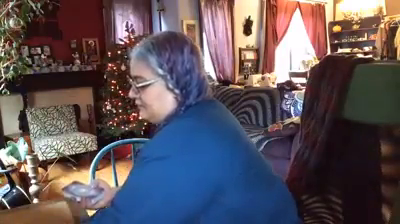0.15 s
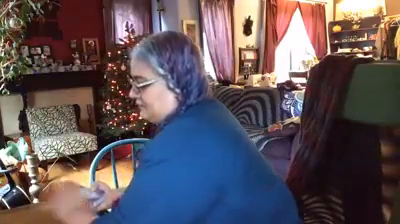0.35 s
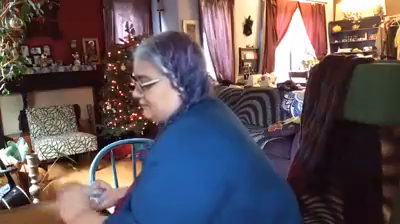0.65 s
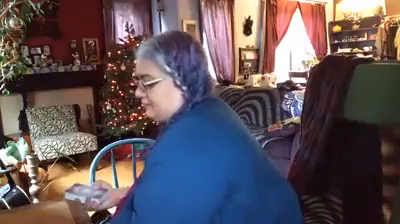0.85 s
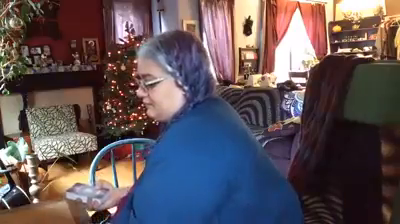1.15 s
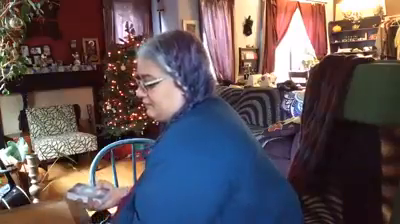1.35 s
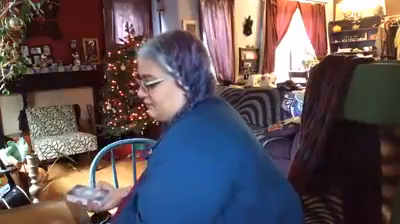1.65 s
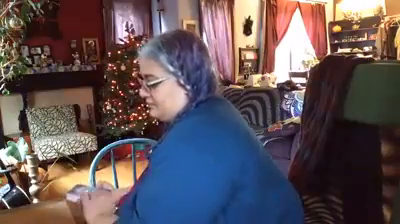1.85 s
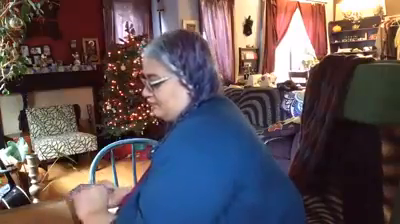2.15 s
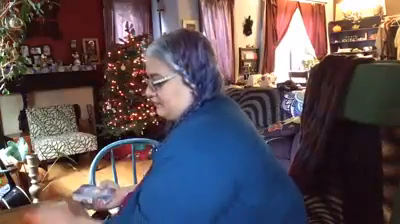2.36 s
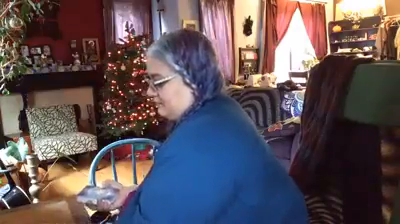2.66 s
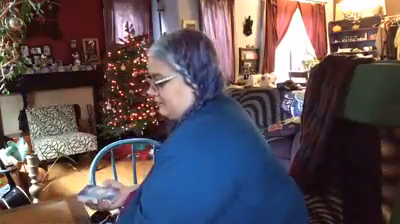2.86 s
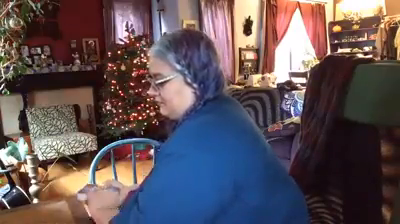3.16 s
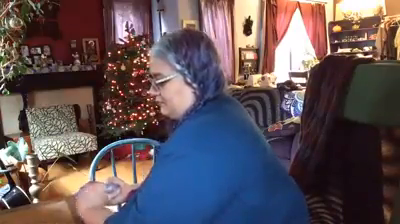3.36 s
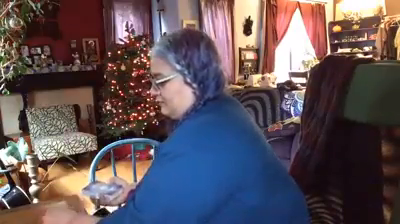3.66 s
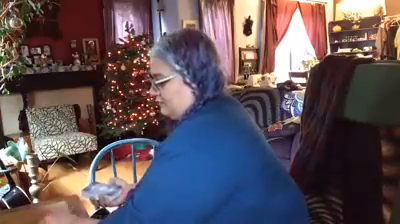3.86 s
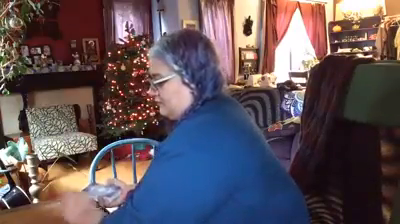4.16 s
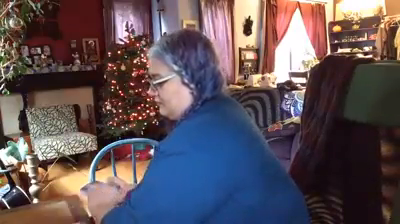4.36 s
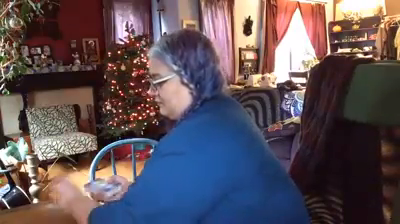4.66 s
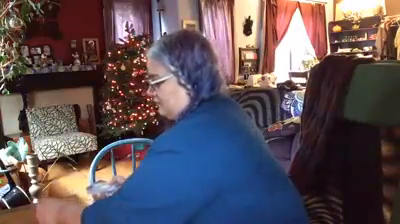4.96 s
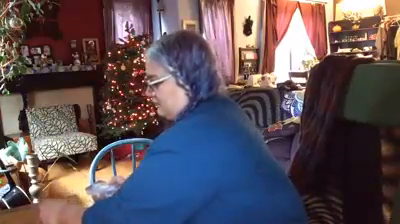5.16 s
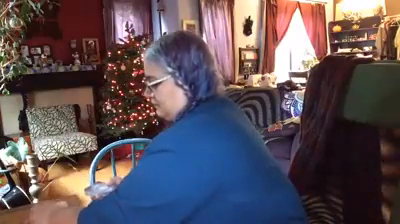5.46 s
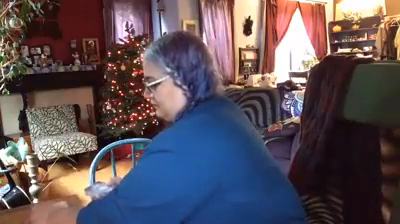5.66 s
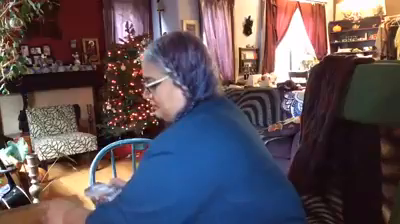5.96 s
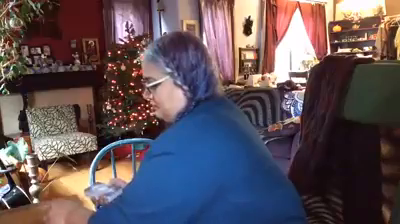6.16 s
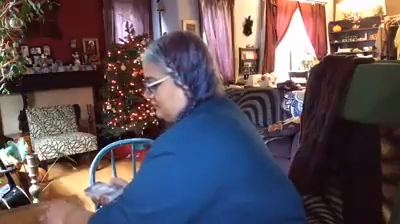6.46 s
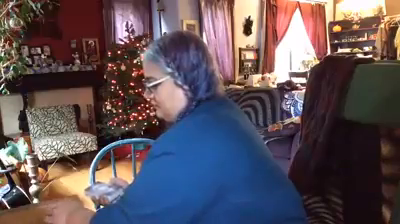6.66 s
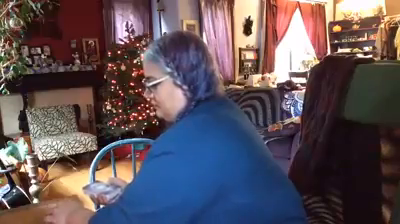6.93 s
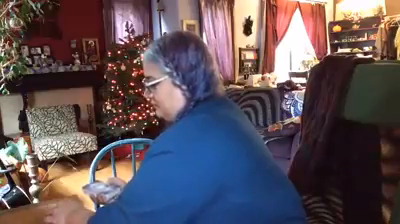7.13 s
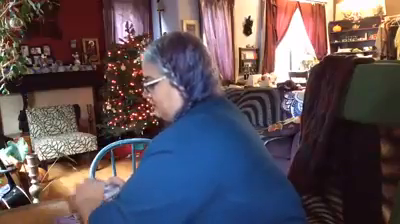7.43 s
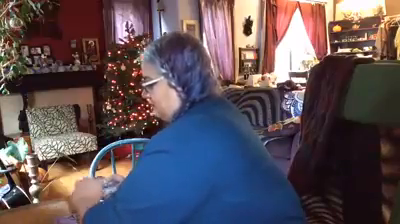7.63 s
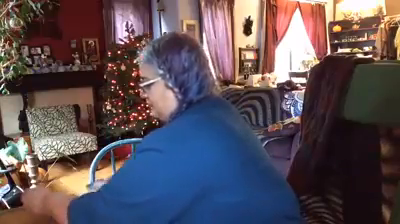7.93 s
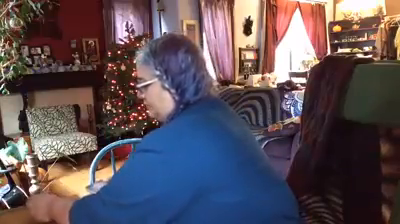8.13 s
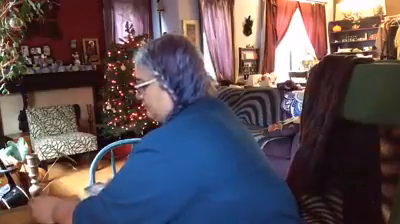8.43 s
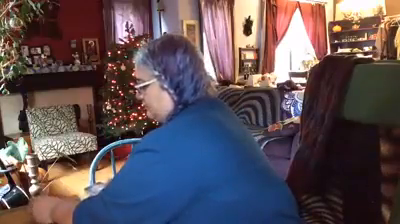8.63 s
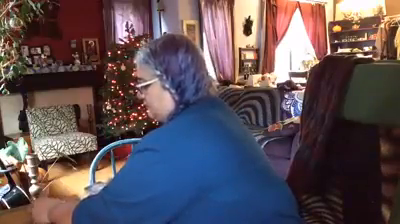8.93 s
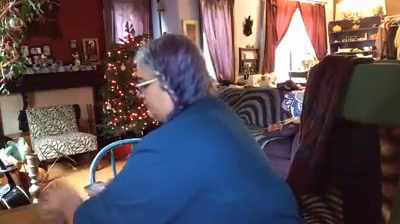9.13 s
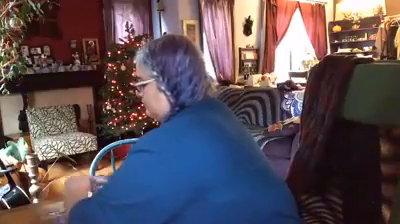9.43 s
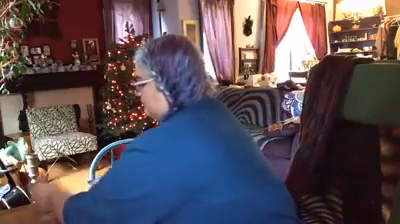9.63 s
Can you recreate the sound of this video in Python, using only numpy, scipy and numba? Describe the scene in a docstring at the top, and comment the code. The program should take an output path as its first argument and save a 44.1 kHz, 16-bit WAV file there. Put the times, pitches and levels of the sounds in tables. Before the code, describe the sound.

Playing cards slide off a deck and snap onto a wooden table at irregular intervals, while a low engine-like drone swells early and fades.

```python
"""Dealing cards onto a table

Playing cards are dealt one by one onto a wooden table in a quiet, furnished living room.
Each card rubs off the deck (filtered noise), ticks against its neighbours and is snapped down
(noise bursts through resonances), knocking the table top (decaying sines). A sleeve rustles.
A low drone of wavering sines and rumble, probably an engine outside, swells and fades under faint hiss."""
import sys
import numpy as np
from scipy import signal
from scipy.fft import rfft, irfft, next_fast_len
from scipy.io import wavfile
from scipy.ndimage import uniform_filter1d, map_coordinates
from numba import njit

SR = 44100
rng = np.random.default_rng(int(sys.argv[2]) if len(sys.argv) > 2 else 0)


def generate_wav(sig):
    """Save sig (samples, or channels by samples) to the path in sys.argv[1] as 16-bit PCM at SR."""
    pcm = np.round(np.clip(np.atleast_2d(sig).T, -1, 1) * 32767).astype(np.int16)
    wavfile.write(sys.argv[1], SR, pcm)


N = 431738
T = np.arange(N) / SR
CONTACT_LEAD_S = 1 / 50  # build-up ahead of each contact

# cards snapped down: (time [s], slap [dB], flex [dB], crack [dB], flutter t60 [s], table knock [dB],
#   spot across the table [0-1], lower slap note [Hz], upper slap note [Hz], upper against lower [dB],
#   flex note [Hz], flex note against the broad flex [dB])
SNAP_EVENTS = [ (0.1802, -52, -62, -59, 0.029, -48, 0.25, 670, 1154, -1, 2360, -5),
               (1.2675, -47.5, -43, -39, 0.027, -42, 0.44, 618, 834, 0.5, 3950, 2),
               (2.3601, -59.5, -61, -70.5, 0.075, -58, .4, 483, 1216, 7, 2320, 13),
               (2.949, -44.5, -49, -45.5, 0.03, -39, 0.11, 810, 1020, -1, 2990, -1),
               (4.066, -54.5, -58, -60, 0.047, -45.5, 0.57, 600, 1320, 0, 2600, -11),
               (4.712, -63.5, -67, -71.5, .06, -65, 0.28, 600, 1270, -2, 2390, 6),
               (4.9192, -65, -69, -75, 0.09, -60, 0.52, 840, 1180, 5, 3470, -6),
               (5.587, -66, -69, -82, 0.058, -55.5, 0.44, 580, 830, -7, 2850, -1.5),
               (6.149, -69.5, -59.5, -75, 0.04, -68, 0.22, 1097, 1600, -4, 2860, 13),
               (6.464, -64, -65.5, -60, .05, -59.5, 0.1, 734, 810, -8, 3580, 1.5),
               (9.015, -54.5, -56, -61.5, 0.032, -61, .3, 756, 1010, 4, 3910, -1.5),
               (9.773, -65.5, -73.5, -78, 0.11, -63, 0.4, 810, 1320, 8, 3010, -5)]
# colour of air squeezed from under a card: (frequency [Hz], gain [dB])
SLAP_COLOUR = [(100, -8), (300, -1), (520, -2), (800, -0.5), (1250, -2), (1700, -12.5), (4000, -50)]
# colour of a bending card: (frequency [Hz], gain [dB])
FLEX_COLOUR = [(900, -16), (1500, 0), (2300, 7), (4100, 6.5), (5000, -4), (8000, -32)]
# colour of a card's crisp edge: (frequency [Hz], gain [dB])
CRACK_COLOUR = [(3000, -19.5), (5000, 0), (6800, 0.5), (10500, 0), (13000, -2.5), (16000, -7.5)]


def undb(db):
    """Decibels to gain."""
    return 10 ** (np.asarray(db) / 20)


def unit(x):
    """Scale to rms 1."""
    return x / np.sqrt(np.mean(x ** 2))


def decay(t, t60):
    """Exponential fall by 60 dB in t60 seconds."""
    return np.exp(-np.log(1000) * t / t60)


def add(out, x, s):
    """Mix x into out from time s on."""
    i = int(s * SR)
    out[i:i + len(x)] += x[:max(N - i, 0)]


def colour(x, points, size=4096):
    """Minimum-phase filter with the given (Hz, dB) outline, made by folding the cepstrum."""
    hz, db = np.transpose(points)
    log_hz = np.log(np.fft.rfftfreq(size, 1 / SR) + 1)
    gain = undb(np.interp(log_hz, np.log(hz), db))
    cepstrum = irfft(np.log(gain))
    cepstrum[1:size // 2] *= 2
    cepstrum[size // 2 + 1:] = 0
    impulse = irfft(np.exp(rfft(cepstrum)))
    return signal.fftconvolve(x, impulse)[:len(x)]


def ring(x, hz, q):
    """One fixed resonance."""
    return signal.lfilter(*signal.iirpeak(min(hz, SR / 2 - 1), q, fs=SR), x)


def walk(rate_hz):
    """Smooth random wander with rms 1."""
    k = int(SR / rate_hz)
    steps = np.repeat(rng.standard_normal(N // k + 1), k)
    return unit(uniform_filter1d(steps, k)[:N])


def grains(n, spread_db):
    """Tiny slips of paper fibres, a few much larger than the rest: noise of random level, rms 1."""
    return unit(rng.standard_normal(n) * undb(spread_db * rng.standard_normal(n)))


def contact(t60, rise_s, click, spread_db):
    """A card meets something: a quick build-up, one sharp click, then dying flutter."""
    t = np.arange(SR // 10) / SR - CONTACT_LEAD_S
    envelope = np.where(t < 0, np.exp(-np.abs(t) / rise_s), decay(np.abs(t), t60))
    flutter = grains(len(t), spread_db) * envelope
    impulse = signal.unit_impulse(len(t), np.argmin(np.abs(t)))
    return flutter / np.linalg.norm(flutter) + click * impulse


def snaps():
    """A bent card lets go: air slaps out beneath it, the sheet rings briefly, its edge cracks."""
    # the louder its crack, the crisper a snap:
    # (crack level [dB], crack resonance [Hz], build-up [s], click against flutter [ratio])
    crispness = [(-72, 5000, 0.0029, 0.11), (-59, 5400, 0.0024, 0.44), (-39, 9400, 0.00083, 0.69)]
    slap_q, slap_body_db = 8.8, -3.5
    crack_rise_s = 0.0014
    out = np.zeros(N)
    steps, *traits = np.transpose(crispness)
    for (s, slap_db, flex_db, crack_db, t60, _, _,
         lower_hz, upper_hz, upper_db, flex_hz, note_db) in SNAP_EVENTS:
        crack_hz, rise_s, click = (np.interp(crack_db, steps, trait) for trait in traits)
        push = contact(t60, rise_s, click, spread_db=6.0)
        lower = unit(ring(push, lower_hz, slap_q))
        upper = unit(ring(push, upper_hz, slap_q))
        body = unit(ring(push, np.sqrt(lower_hz * upper_hz), 1.5))
        puff = lower + undb(upper_db) * upper + undb(slap_body_db) * body
        flex_note = unit(ring(push, flex_hz, 7.0))
        flex = unit(colour(push, FLEX_COLOUR)) + undb(note_db) * flex_note
        edge = contact(t60, crack_rise_s, click, spread_db=6.0)
        crack = colour(ring(edge, crack_hz, 0.93), CRACK_COLOUR)
        x = undb(slap_db) * unit(colour(puff, SLAP_COLOUR))
        x += undb(flex_db) * unit(flex)
        x += undb(crack_db) * unit(crack)
        add(out, x, s - CONTACT_LEAD_S)
    return out


def knocks(detune=.012):
    """Fingers press the card home; the table's modes answer in strengths that depend on the spot."""
    # table-top modes: (nominal frequency [Hz], level against the knock [dB], t60 [s])
    table_modes = [(168, 0, 0.13), (215, -3.5, 0.095), (272, -0.5, 0.22), (428, 0.5, 0.07),
                   (502, -7, 0.053), (610, -10.5, 0.046)]
    knock_lag_s = 0.0012  # the fingers land just after the card
    out, t = np.zeros(N), np.arange(SR // 3) / SR
    hz, db, t60 = np.transpose(table_modes)[:, :, None]
    for s, _, _, _, _, level_db, spot, *_ in SNAP_EVENTS:
        pitch_hz = hz * (1 + detune * rng.standard_normal(hz.shape))
        shape = np.sin(np.pi * spot * np.arange(1, len(hz) + 1))[:, None]
        modes = shape * undb(db + level_db) * np.sin(2 * np.pi * pitch_hz * t) * decay(t, t60)
        add(out, modes.sum(axis=0), s + knock_lag_s)
    return out


def ticks():
    """Card edges flick past each other, each bending the card at another pitch."""
    # (time [s], level of the flex part [dB], brightness [dB])
    tick_events = [(0.596, -78, 4), (0.695, -71, -1.5), (.728, -75, -5.5), (.775, -78, -4),
                   (.823, -71.5, 6.5), (0.941, -74, -9), (1.551, -70, 8), (1.95, -80, 0), (2.196, -72, 3.5),
                   (2.504, -66.5, -2.5), (2.671, -75, 0), (2.991, -69, 8), (3.26, -74.5, 3.5),
                   (3.486, -69.5, 2.5), (3.513, -68.5, -1.5), (3.767, -71, -8.5), (4.41, -78.5, 2),
                   (4.684, -75, 7.5), (6.792, -82, 3), (7.577, -73.5, 1), (7.605, -75.5, 0.5),
                   (7.954, -77, -3), (9.381, -79, 2), (9.556, -70.5, 9.5), (9.581, -76, -3.5)]
    slap_rel_db, crack_rel_db = -2, -4.5  # against the flex; brightness trades slap for crack
    out = np.zeros(N)
    for s, level_db, bright_db in tick_events:
        push = contact(t60=0.061, rise_s=0.003, click=0.085, spread_db=3.0)
        bend = push + 1.13 * ring(push, rng.uniform(2000, 2800), 8.3)
        slap = unit(colour(ring(push, 1100, 1.0), SLAP_COLOUR))
        crack = unit(colour(push, CRACK_COLOUR))
        x = undb(slap_rel_db - bright_db) * slap
        x += unit(colour(bend, FLEX_COLOUR))
        x += undb(crack_rel_db + bright_db) * crack
        add(out, undb(level_db) * x, s - CONTACT_LEAD_S)
    return out


def stroke(s, rise_s, fall_s, fullness):
    """The samples that a stroke of the hand spans, and its speed, peaking at time s."""
    span = (T > s - rise_s) & (T < s + fall_s)
    ramp = np.interp(T[span] - s, [-rise_s, 0, fall_s], [0, 1, 0])
    return span, np.sin(np.pi / 2 * ramp) ** fullness


@njit
def glide(x, hz, q):
    """One resonance whose pitch moves: a state-variable band-pass."""
    y, band, low = np.empty(len(x)), 0., 0.
    for i in range(len(x)):
        g = np.tan(np.pi * min(hz[i], .45 * SR) / SR)
        y[i] = (band + g * (x[i] - low)) / (1 + g * (g + 1 / q))
        band, low = 2 * y[i] - band, low + 2 * g * y[i]
    return y


def patchy(x, depth_db, rate_hz, count=13):
    """The touching patch of paper keeps changing, so each band swells and fades by itself."""
    centres = np.linspace(np.log(500), np.log(14000), count)
    spectrum = rfft(x)
    log_hz = np.log(np.fft.rfftfreq(len(x), 1 / SR) + 1)
    out = np.zeros(N)
    for peak in np.eye(count):
        band = irfft(spectrum * np.interp(log_hz, centres, peak), len(x))[:N]
        out += band * undb(depth_db * walk(rate_hz))
    return unit(out)


def slides(catch_db=1.0, lurch_db=0.82, spread_db=4.5):
    """Paper rubs on paper, louder as the hand speeds up; the card resonates, rising as it slides clear."""
    # paper rubbing on paper: (frequency [Hz], gain [dB])
    rub_colour = [(200, 6), (600, 1), (1300, 4.5), (2600, -0.5), (4100, 0), (5200, -7), (9000, -23)]
    # treble of a quick brush: (frequency [Hz], gain [dB])
    hiss_colour = [(2500, -40), (4800, 2), (6800, 10.5), (10000, 4.5), (13000, 0), (16000, -2)]
    # finer treble of a card drawn flat over the deck: (frequency [Hz], gain [dB])
    sheen_colour = [(2500, -35), (4800, 1), (7000, 8.5), (10000, 4.5), (15500, 0.5)]
    # a card is drawn off the deck or pushed along the table; one stops before its peak:
    # (start [s], fastest [s], end [s], rub [dB], hiss [dB], card resonance [dB], its pitch when fastest [Hz])
    draws = [(0.523, 0.623, 0.96, -69.5, -69.5, -75.5, 2460), (1.02, 1.26, 1.195, -67, -80, -74, 3600),
             (1.27, 1.3, 1.488, -71, -77.5, -87.5, 2430), (1.318, 1.65, 1.677, -63.5, -67, -95, 2500),
             (1.99, 2.191, 2.3, -72.5, -69, -78, 2760), (3.268, 3.416, 3.7, -71, -68.5, -75, 2660),
             (4.403, 4.65, 4.86, -75.5, -72.5, -78.5, 2700), (4.92, 5.02, 5.12, -74, -74, -73.5, 2700),
             (5.11, 5.14, 5.34, -73, -74, -79, 2500), (5.36, 5.475, 5.61, -70, -68.5, -71.5, 2600),
             (5.557, 5.68, 5.97, -75, -84, -85, 2540), (5.831, 5.952, 6.13, -71.5, -69, -73.5, 3070),
             (7.6, 7.763, 7.82, -80, -71, -74, 2420), (7.82, 7.895, 8.1, -73, -73.5, -81, 2380),
             (9.38, 9.516, 9.83, -76.5, -69, -74.5, 2680)]
    # a card brushes quickly over another:
    # (fastest [s], rub [dB], hiss [dB], card resonance [dB], its pitch when fastest [Hz])
    brushes = [(1.099, -70, -65.5, -72, 2900), (1.258, -59, -56.5, -59, 4200),
               (2.322, -66, -64.5, -71, 2700), (2.521, -59, -65, -67, 2200), (2.574, -67, -70, -72, 2500),
               (3.68, -60, -67.5, -76, 2600), (3.763, -60.5, -61, -68, 2300),
               (3.88, -67, -72.5, -69.5, 2440), (4.054, -68, -72, -79, 2860), (4.66, -78, -101, -67, 1680),
               (7.768, -77, -67, -70.5, 2400), (8.151, -65.5, -72, -74, 1900),
               (8.421, -73, -69.5, -70, 2577), (8.546, -73, -58, -61, 3100)]
    # a tightly bent card zings: (peak time [s], pitch [Hz], level [dB], fall [s])
    zings = [(1.125, 2550, -68, .06), (1.201, 3100, -55, .035), (2.675, 2700, -60, 0.065),
             (4.68, 2860, -67, .025), (5.46, 2300, -67.5, .1), (6.137, 3030, -67, 0.011),
             (6.185, 3063, -67.5, .11), (6.49, 5660, -60, 0.091), (4.105, 7560, -71, 0.064),
             (6.78, 5100, -72, .06), (7.605, 2780, -69, 0.079), (8.555, 2350, -62, 0.079)]
    crackle_per_s, crackle_db = 150, -6.5  # an edge catches now and then; level against even rubbing
    brush_rise_s, brush_fall_s, zing_rise_s = 0.031, 0.063, 0.013
    card_q, card_glide_oct_per_s, card_wander_oct = 3.0, 0.503, .1  # climbs as the overlap shortens
    scrape_s, scrape_db = 0.014, -12  # edge slips off the thumb around a snap; level against the flex
    skid_rise_s, skid_fall_s, skid_db = 0.031, 0.066, -14  # after a snap; against crack and flex

    catches = unit(rng.standard_normal(N) * (rng.random(N) < crackle_per_s / SR))
    fibres = patchy(grains(next_fast_len(N, True), spread_db), depth_db=3, rate_hz=28)
    unevenness = undb(catch_db * walk(130) + lurch_db * walk(28))
    slips = (fibres + undb(crackle_db) * catches) * unevenness
    rub = unit(colour(slips, rub_colour))
    hiss = unit(colour(slips, hiss_colour))
    sheen = unit(colour(slips, sheen_colour))
    wander_oct = card_wander_oct * walk(23)
    out = np.zeros(N)

    moves = [(s, stroke(s, s - start, end - s, fullness=0.78), sheen, *rest)
             for start, s, end, *rest in draws]
    moves += [(s, stroke(s, brush_rise_s, brush_fall_s, fullness=1.3), hiss, *rest)
              for s, *rest in brushes]
    for s, (span, speed), treble, rub_db, hiss_db, card_db, hz in moves:
        card_hz = hz * 2 ** (card_glide_oct_per_s * (T[span] - s) + wander_oct[span])
        card = unit(glide(rub[span], card_hz, card_q))
        x = undb(rub_db) * rub[span] + undb(hiss_db) * treble[span] + undb(card_db) * card
        out[span] += speed * x

    for s, hz, level_db, fall_s in zings:
        span, speed = stroke(s, zing_rise_s, fall_s, fullness=3.0)
        out[span] += speed * undb(level_db) * unit(ring(slips[span], hz, 11.0))

    for s, _, flex_db, crack_db, *_, flex_hz, _ in SNAP_EVENTS:
        span, speed = stroke(s, scrape_s, scrape_s / 2, fullness=0.69)
        scrape = unit(hiss[span] + 4.4 * ring(slips[span], flex_hz, 4.5))
        out[span] += speed * undb(flex_db + scrape_db) * scrape
        span, speed = stroke(s + skid_rise_s, skid_rise_s, skid_fall_s, fullness=1.5)
        skid = undb(crack_db) * hiss[span] + undb(flex_db) * rub[span]
        out[span] += speed * undb(skid_db) * skid
    return out


def bounce(x):
    """The table mirrors a sliding card; the reflection's lag sways as the hand moves, shifting the colour."""
    share, usual_lag_s, sway = 0.32, 0.001092, .22
    lag_s = usual_lag_s * np.exp(sway * walk(5))
    return x + share * map_coordinates(x, [(T - lag_s) * SR], order=3)


def sleeve():
    """Cloth drags over the table in soft, uneven rustles."""
    # (peak time [s], level [dB])
    rustles = [(3.56, -71.5), (5.68, -69.5), (5.86, -68), (6.92, -79), (7.15, -78), (8.92, -74),
               (9.61, -79.5)]
    # cloth on wood: (frequency [Hz], gain [dB])
    cloth_colour = [(150, -11), (400, 2), (1100, 5), (1700, -10.5), (4000, -22.5)]
    rustle_s = 0.067  # rise, and again fall
    out = np.zeros(N)
    cloth = unit(colour(grains(N, 7.4), cloth_colour)) * undb(3.1 * walk(30))
    for s, level_db in rustles:
        span, speed = stroke(s, rustle_s, rustle_s, fullness=1.6)
        out[span] += speed * undb(level_db) * cloth[span]
    return out


def room(x, wet_db, gap_s=0.0029):
    """Scattered echoes from walls and furniture, soon soaked up: noise bands with their own decays."""
    # (band low [Hz], band high [Hz], t60 [s], level before wet_db [dB])
    room_bands = [(117, 483, 0.27, -19), (700, 2900, 0.32, -19), (1740, 4900, 0.61, -22),
                  (4430, 8200, 0.33, -15.5), (8880, 15000, 0.23, -14.5)]
    t, tail = np.arange(SR // 2) / SR, 0
    onset = np.clip(t / gap_s - 1 / 2, 0, 1)
    for low_hz, high_hz, t60, db in room_bands:
        edges_hz = [low_hz, min(high_hz, SR / 2 - 1)]
        band_pass = signal.butter(3, edges_hz, "band", fs=SR, output="sos")
        echo = signal.sosfilt(band_pass, grains(len(t), 1.2)) * onset * decay(t, t60)
        tail = tail + undb(db) * unit(echo) / np.sqrt(len(t))  # unit energy before the level
    return x + undb(wet_db) * signal.fftconvolve(x, tail)[:N]


def tone(hz, level_db, waver_db, waver_hz):
    """One sine of the drone, wavering in pitch and level."""
    phase = 2 * np.pi * np.cumsum(hz + waver_hz * walk(14)) / SR
    return np.sqrt(2) * np.sin(phase) * undb(level_db + waver_db * walk(11))


def drone():
    """A boom, a hum, weaker tones and rumble; the weaker tones and rumble swell with the boom."""
    # strength before trim: (time [s], deep tone [dB], upper tone [dB])
    drone_levels = [(0.0, -63, -58.5), (.27, -60.5, -62), (.4, -60.5, -54), (0.95, -62, -52.5),
                    (1.16, -57, -59.5), (1.45, -47.5, -52), (1.55, -45, -50), (1.62, -41, -43),
                    (1.78, -38.5, -44), (1.92, -37, -51.5), (2.06, -37.5, -44.5), (2.37, -44, -54),
                    (2.48, -57, -54), (2.61, -44.5, -59), (2.72, -56.5, -55), (2.82, -49, -56.5),
                    (2.98, -66, -49), (3.05, -55.5, -64), (3.35, -66, -67.5), (4.95, -60, -65.5),
                    (6.0, -61, -66), (6.539, -65.5, -63), (6.76, -56, -68.5), (7.58, -71, -73.5),
                    (9.79, -72, -73)]
    # the engine gathers speed twice: (time [s], deep tone [Hz], upper tone [Hz])
    engine_pitch = [(0, 56, 121.3), (.6, 56.5, 124), (1.5, 57.5, 126), (2.05, 58.6, 129), (3, 60, 125.4),
                    (4.2, 62, 117.8), (5.2, 65, 123), (5.5, 57, 125), (6.601, 62, 133), (7.3, 60, 131),
                    (7.9, 57, 116.1), (9.79, 58, 118)]
    # weaker tones: (share of the upper tone's pitch [ratio], level at usual_db [dB],
    #   share of the deep tone's swell in dB [ratio])
    side_tones = [(0.489, -71.5, 0.56), (.605, -71, .4), (.74, -76, .85), (0.819, -77, 0.9),
                  (0.892, -75, 0.63), (1.6, -83.5, 0.81)]
    # rumble around the drone: (frequency [Hz], gain [dB])
    rumble_colour = [(25, -13), (38, -3.5), (52, -2.5), (75, -2), (110, -2), (150, -6.5), (175, -17.5),
                     (205, -13.5), (240, -20), (600, -56.5)]
    usual_db = -60  # deep tone before trim, reference for the swell
    deep_trim_db, upper_trim_db = -1.27, -1
    rumble_db, swell_share = -65, 0.54  # rumble level at usual_db; share of the swell it follows

    s, deep, upper = np.transpose(drone_levels)
    deep_db, upper_db = np.interp(T, s, deep), np.interp(T, s, upper)
    s, deep, upper = np.transpose(engine_pitch)
    deep_hz, upper_hz = np.interp(T, s, deep), np.interp(T, s, upper)
    swell_db = deep_db - usual_db
    boom = tone(deep_hz, deep_db + deep_trim_db, waver_db=1.0, waver_hz=0.4)
    hum = tone(upper_hz, upper_db + upper_trim_db, waver_db=2.0, waver_hz=0.76)
    sides = sum(tone(ratio * upper_hz, db + share * swell_db, waver_db=2.5, waver_hz=0.65)
                for ratio, db, share in side_tones)
    rumble = unit(colour(rng.standard_normal(N), rumble_colour))
    return boom + hum + sides + rumble * undb(swell_share * swell_db + rumble_db)


def still_air():
    """Faint room hiss: coloured noise with a slightly wandering level."""
    # (frequency [Hz], gain [dB])
    air_colour = [(88, -21.5), (150, -5), (162, -9.5), (201, -10), (302, -10), (471, -14), (530, -13),
                  (595, -13.5), (827, -15), (1630, -18.5), (1830, -21), (2230, -20), (2550, -21.5),
                  (12300, -29.5), (15500, -36.5)]
    air = unit(colour(rng.standard_normal(N), air_colour))
    return air * undb(-71.5 + 0.68 * walk(5.5))


def scene():
    """Cards and sleeve with room echoes, the table's knocks without, over the drone and still air."""
    snapped = room(snaps(), wet_db=-2.0)
    handled = room(ticks() + bounce(slides()) + sleeve(), wet_db=1.0)
    return (snapped + handled + knocks() + drone() + still_air())[None]


def record(dry):
    """The microphone has a shallow dip in the treble, and the recorder cuts the very top."""
    dip_hz, dip_q, dip_share, top_hz = 4930, 3.4, 0.36, 15450
    heard = dry - dip_share * ring(dry, dip_hz, dip_q)
    return signal.sosfilt(signal.ellip(10, .2, 70, top_hz, fs=SR, output="sos"), heard)


dry = scene()
out = record(dry)
generate_wav(out)
```